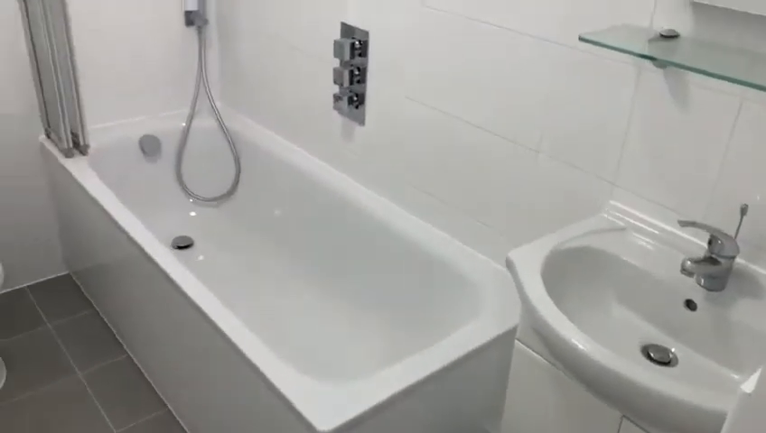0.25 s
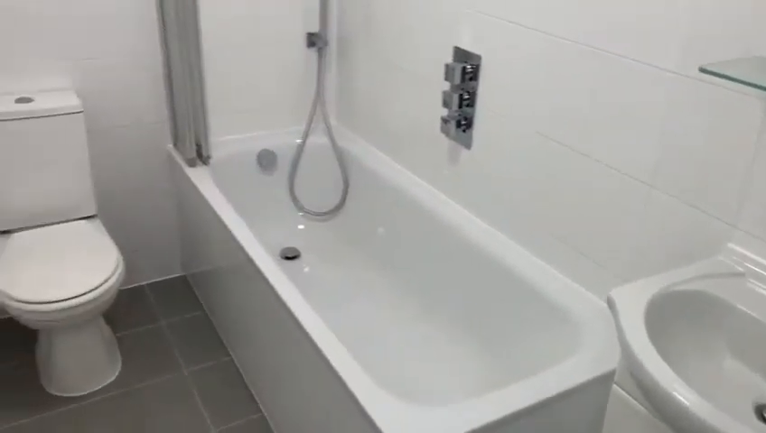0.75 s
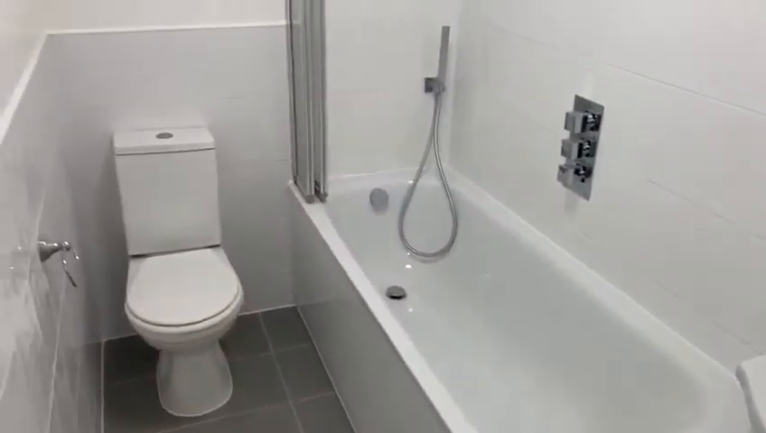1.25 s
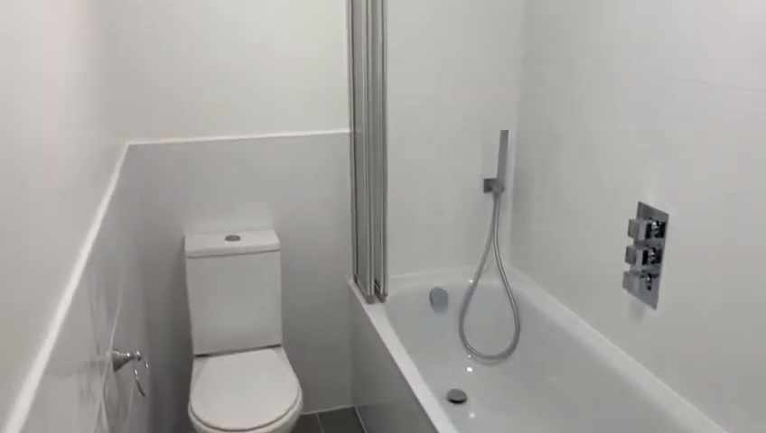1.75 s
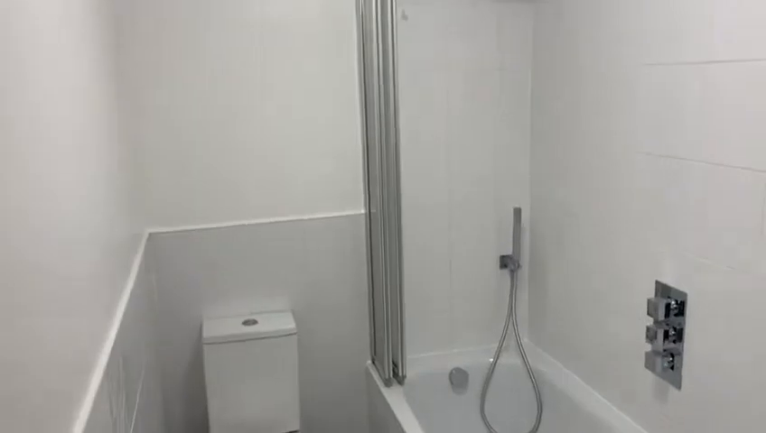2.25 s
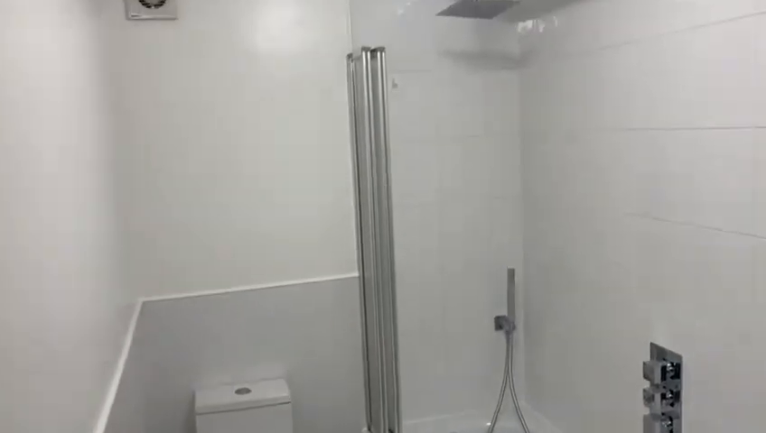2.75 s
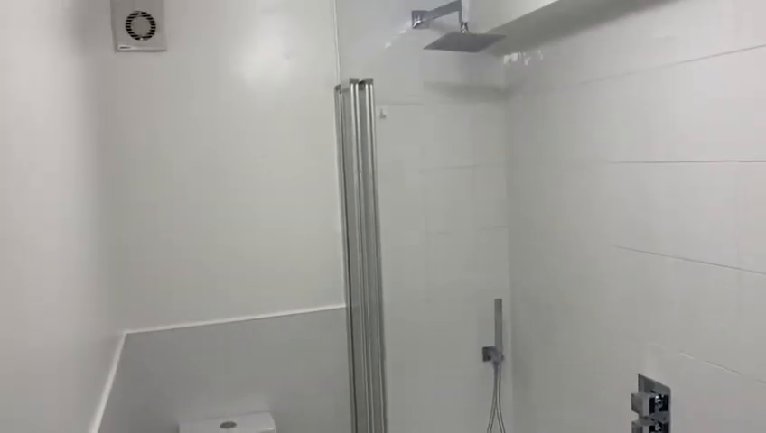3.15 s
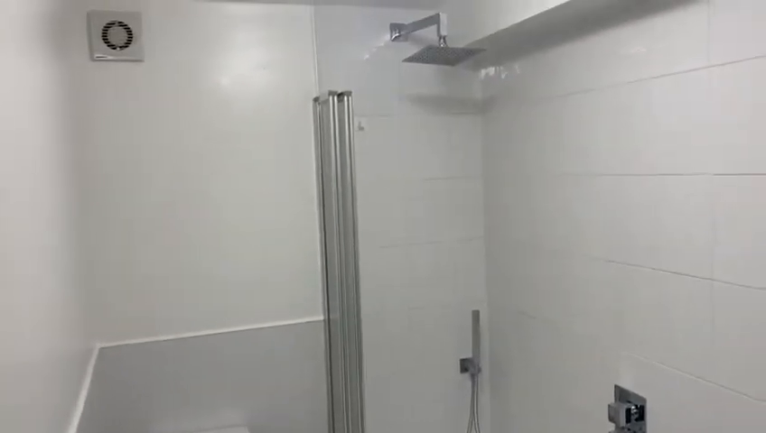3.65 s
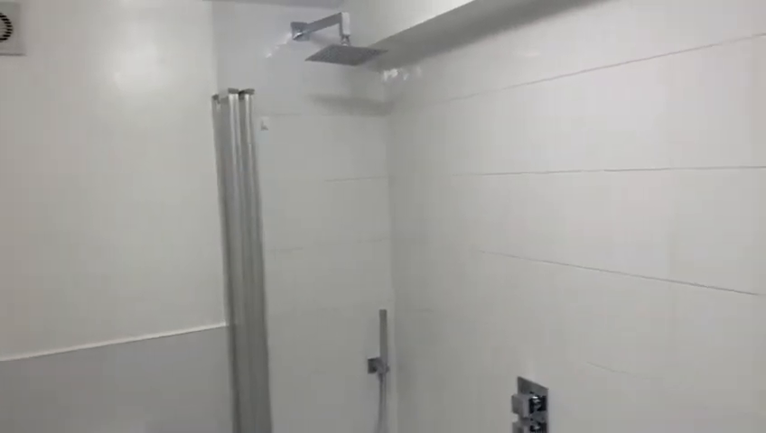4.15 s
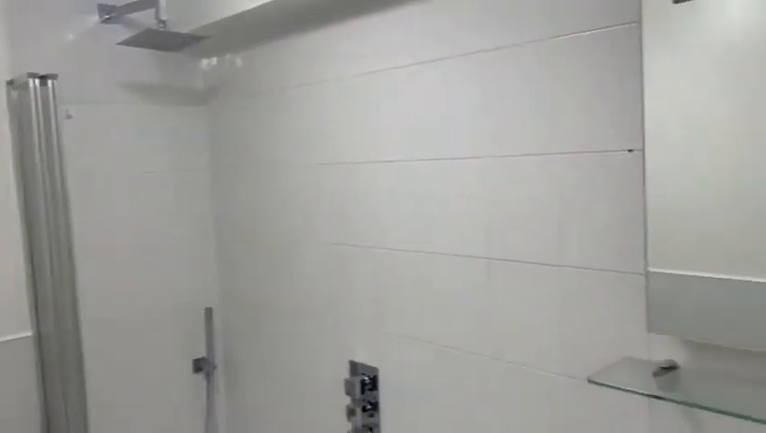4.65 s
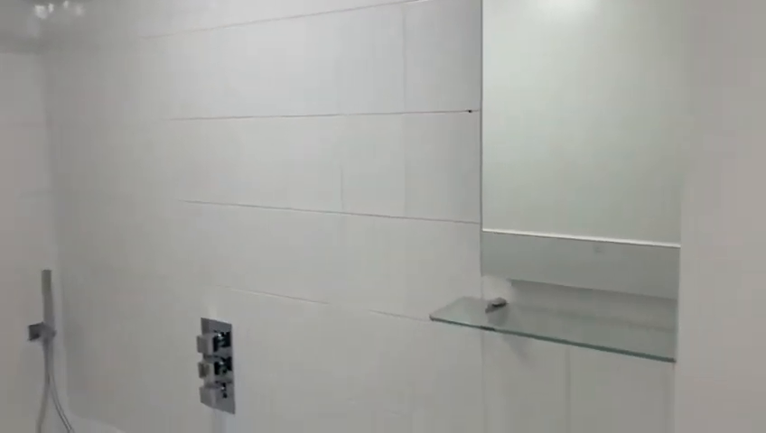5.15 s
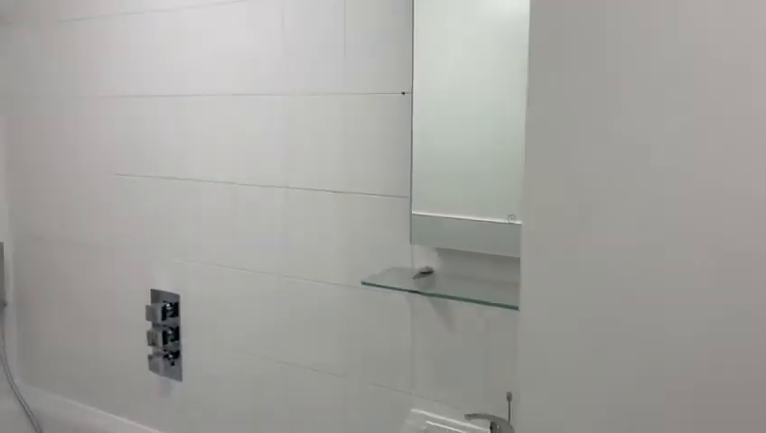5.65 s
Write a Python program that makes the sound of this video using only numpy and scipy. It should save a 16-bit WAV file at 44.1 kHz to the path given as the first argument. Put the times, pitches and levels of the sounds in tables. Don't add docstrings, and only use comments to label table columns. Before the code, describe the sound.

Steady bathroom fan drone, low and electrical, dominates from start to end, with a thin buzz and dull airflow behind it. Close to the hand-held microphone a sleeve rubs and soles slide at the opening; muffled weight shifts follow near three seconds, a faint brush at four, and short scuffs at about 5.4 and 5.8. The small tiled room makes individual tones drift in level and stereo position. Quiet, slightly dull capture.

```python
import sys
import numpy as np
from scipy import signal
from scipy.fft import rfft, irfft, next_fast_len
from scipy.io import wavfile
from scipy.ndimage import uniform_filter1d, map_coordinates

SR = 44100
rng = np.random.default_rng(int(sys.argv[2]) if len(sys.argv) > 2 else 0)


def bounce(signal):
    frames = np.transpose(np.atleast_2d(signal))
    limited = np.clip(frames, -1, 1)
    pcm = np.round(limited * 32767).astype(np.int16)
    wavfile.write(sys.argv[1], SR, pcm)


def decibels_to_gain(level_db):
    exponent = np.asarray(level_db, float) / 20
    return 10 ** exponent


N = 260183

PULL_HZ, SHAFT_HZ = 100.13, 42.76
FIRST_CREST_S = .00262
# (time [s], distance moved [cm])
WALK = [(0, 5), (1.2, 10.7), (2.2, 22.6), (3.3, 32.3), (4.2, 34.2), (5, 52), (5.55, 50), (5.7, 69.4),
        (5.9, 77)]


def unit(x):
    return x / np.sqrt(np.mean(x ** 2) + 1e-20)


def along(points, hz):
    f, v = np.transpose(points)
    return np.interp(np.log(hz + 1), np.log(f + 1), v)


def curves(rows):
    s, *cols = np.transpose(rows)
    return [np.interp(np.arange(N) / SR, s, c) for c in cols]


def wobble(rate):
    knots = rng.standard_normal(int(N * rate / SR) + 4)
    return map_coordinates(knots, [np.arange(N) * rate / SR])


def ports(pan_db):
    return decibels_to_gain(np.array([pan_db / 2, -pan_db / 2]))


def standing(wave):
    crest_db, place, spacing, depth_db = np.transpose(wave)[..., None]
    moved_cm = curves(WALK)[0]
    return crest_db - depth_db * np.sin(np.pi * (moved_cm - place) / spacing) ** 2


def tone(hum, shaft, lag):
    turns = (hum * PULL_HZ + shaft * SHAFT_HZ) * (np.arange(N) / SR - FIRST_CREST_S)
    return np.sqrt(2) * np.cos(2 * np.pi * turns - lag)


def rush(spectrum, patchy_db, lead_s, direct=1):
    # (frequency [Hz], left-right likeness [0-1])
    alike = [(30, .9), (80, 0.6), (200, .8), (400, .5), (1000, 0.36), (3000, 0.32), (6000, 0.24),
             (8500, 0.26), (11000, 0.4)]
    # (frequency [Hz], left-right difference [dB])
    lean = [(30, -6), (80, 8.5), (250, 1), (1000, 0), (8000, -2)]
    z = signal.stft(rng.standard_normal((2, N + 1024)), nperseg=512)[2]
    patches = uniform_filter1d(rng.standard_normal(z.shape[1:]), size=6, axis=0)
    patches = uniform_filter1d(patches, size=14, axis=1)
    pair = signal.istft(z * decibels_to_gain(patchy_db * unit(patches)), nperseg=512)[1]
    m = next_fast_len(N + 8192)
    hz = np.fft.rfftfreq(m, 1 / SR)
    turn = np.arccos(np.clip(direct * along(alike, hz), -1, 1)) / 2
    mid, side = rfft(pair, m) * decibels_to_gain(along(spectrum, hz)) * [np.cos(turn), np.sin(turn)]
    lead = np.exp(1j * np.pi * hz * lead_s * np.array([[1], [-1]]))
    stereo = np.array([mid + side, mid - side]) * ports(along(lean, hz)) * lead
    return unit(irfft(stereo, m)[:, :N])


def strokes(peak, rise, fall, db):
    edge_db = 15.5
    late = np.arange(N) / SR - peak
    away = np.where(late < 0, -late / rise, late / fall)
    return decibels_to_gain(db - edge_db * away ** 0.88).sum(0)


def drone():
    # (time [s], lag [rad], extra lag at the left port [rad])
    drag = [(0, .2, 0), (1.5, .05, .25), (3.8, 0, .25), (4.4, .15, 0), (5, .45, -.15), (5.5, .75, 0),
            (5.9, .85, .4)]
    # (crest [dB], crest place [cm], crest spacing [cm], depth [dB])
    drone_wave = [(-35, 30, 67, 2), (-33, 24.4, 55, 2.5)]
    lag, left_lag = curves(drag)
    sway_db = 0.5 * np.array([wobble(12), wobble(12)])
    return decibels_to_gain(standing(drone_wave) + sway_db) * tone(1, 0, np.array([lag + left_lag, lag]))


def octave():
    # (crest [dB], crest place [cm], crest spacing [cm], depth [dB])
    octave_wave = [(-44.5, 90, 170, 3.5), (-40, 16, 310, 0.91)]
    flutter_db, flutter_hz, flutter_wide_hz = [[-57], [-54]], -6.5, 7
    slip = -2 * np.pi * flutter_hz * np.arange(N) / SR
    flutter = sum(wobble(flutter_wide_hz) * tone(2, 0, slip + q) for q in (0, np.pi / 2))
    return decibels_to_gain(standing(octave_wave)) * tone(2, 0, 1.2) + decibels_to_gain(flutter_db) * unit(flutter)


def buzz():
    orders = [
        (3, 0, .5),
        (4, 0, -.4),
        (5, 0, 1.2),
        (1, 13, 0),
        (0, 45, 0),
        (0, 26, 0),
        (6, 0, 0),
        (0, 13, 0),
    ]
    side_phase = [(0.14, -0.013), (1.5, -0.015), (1.17, 0.0081), (0.1, 0.056), (4, -.07), (1.65, -0.0039),
                  (0.5, .01), (0.5, 0.003)]
    # (crest [dB], crest place [cm], crest spacing [cm], depth [dB])
    third_wave = [(-62, 41, 96, 11), (-51.5, 53.7, 160, 23)]
    fourth_wave = [(-53, 51, 91, 10.3), (-60, 58, 52, 7.5)]
    fifth_wave = [(-60, 56, 130, 7), (-56.5, 27, 44, 3.7)]
    slot_wave = [(-60, 20, 96, 10), (-59, 11, 100, 8)]
    whistle_wave = [(-71, 43, 15, 13), (-70.5, 43, 15, 16)]
    low_whistle_wave = [(-71, 48, 75, 8), (-74, 46, 40, 6.8)]
    sixth_wave = [(-71.5, 43, 100, 3), (-65, 12, 97, 9)]
    bar_wave = [(-71, 40, 80, 4), (-68, 45, 80, 8)]
    waves = (third_wave, fourth_wave, fifth_wave, slot_wave,
             whistle_wave, low_whistle_wave, sixth_wave, bar_wave)
    moved_cm = curves(WALK)[0]
    out = np.zeros((2, N))
    for wave, (multiple, order, late), (gap, turning) in zip(waves, orders, side_phase):
        unsteady = decibels_to_gain(standing(wave) + 1.3 * np.array([wobble(3.6), wobble(6.9)]))
        drift = (0.069 + 0.045 * order) * wobble(1.2)
        port_lag = [[0], [1]] * (gap + turning * moved_cm)
        out += unsteady * tone(multiple, order, late + drift + port_lag)
    return out


def rotor():
    orders = [(1, 1), (2, -1), (2, 1), (3, -1), (2, 2), (4, -1), (0, 9), (0, 15), (1, 14), (0, 39), (0, 54)]
    # (level [dB], left-right difference [dB])
    levels = [(-61, -3), (-57.5, -3), (-68, 0), (-69, 0), (-69, 0), (-74, 0), (-67, 3), (-73, -2), (-77, 0),
              (-84.5, -2), (-90, 0)]
    out = np.zeros((2, N))
    for (multiple, order), (db, pan_db) in zip(orders, levels):
        fading = decibels_to_gain(db + (0.1 + 0.1 * abs(order)) * np.array([wobble(1.3), wobble(0.97)]))
        port_drift = min(1.1, 0.033 * multiple + 0.2 * abs(order))
        drift = .16 * order * wobble(1.6) + port_drift * np.array([wobble(0.64), wobble(.7)])
        out += fading * ports(pan_db)[:, None] * tone(multiple, order, drift)
    return out


def air():
    # (frequency [Hz], density [dB/Hz])
    duct_spectrum = [(15, -27), (25, -18), (40, -13), (55, -12), (80, -3), (120, -8.5), (180, -9),
                     (260, -7.5), (330, -11.5), (450, -14), (620, -17.5), (760, -23.5), (1100, -32),
                     (1500, -120)]
    # (frequency [Hz], density [dB/Hz])
    grille_spectrum = [(300, -39.5), (600, -6), (780, -1.5), (880, -1.5), (1100, .5), (1300, -3),
                       (2000, -4), (2600, -7.5), (3100, -7), (3350, -11), (3650, -10), (4200, -12),
                       (5200, -18.5), (6500, -26), (7400, -25.5), (8000, -28), (10000, -29), (11800, -38.5),
                       (13000, -120)]
    duct_wave, grille_wave = (-48.5, 29.5, 75, 2), (-58.5, 42.5, 50.5, 1.17)
    upper_hz, upper_wave = 480, (.7, 18, 110, 4)
    lead_s = .00045
    duct = decibels_to_gain(.4 * wobble(7)) * rush(duct_spectrum, patchy_db=.5, lead_s=lead_s / 2)
    highpass = signal.butter(2, upper_hz, "high", fs=SR, output="sos")
    upper = signal.sosfiltfilt(highpass, duct)
    duct = duct + (decibels_to_gain(standing(upper_wave)) - 1) * upper
    grille = rush(grille_spectrum, patchy_db=1.73, lead_s=lead_s, direct=.7)
    grille = decibels_to_gain(0.39 * wobble(6.7)) * grille
    return decibels_to_gain(standing(duct_wave)) * duct + decibels_to_gain(standing(grille_wave)) * grille


def rustle():
    # (peak [s], rise [s], fall [s], cloth level [dB], sole level [dB])
    slides = [(.17, 0.18, 0.18, -69, -63), (.28, 0.21, 0.21, -61, -65.5), (.45, 0.18, 0.15, -63.5, -63.5),
              (.548, 0.03, 0.08, -57.5, -66), (.59, .06, .08, -57.5, -68), (3.93, 0.086, 0.13, -65, -82),
              (4.14, 0.15, 0.4, -62.5, -68.5), (5.411, 0.11, 0.19, -59, -65.5),
              (5.459, 0.05, 0.086, -63.5, -56.5), (5.8, 0.048, 0.091, -58, -68),
              (5.83, 0.027, .05, -62, -62)]
    # (peak [s], rise [s], fall [s], level [dB])
    brushes = [
        (.3, .15, 0.25, -73),
        (.55, .04, 0.084, -72),
        (4.049, .2, .35, -79),
        (5.41, .07, 0.13, -71),
    ]
    # (frequency [Hz], density [dB/Hz])
    cloth_spectrum = [(1200, -41), (2200, -3.5), (3200, 1), (4800, 0), (6500, -5), (8400, -13.5),
                      (10300, -22), (11600, -24.5), (13000, -120)]
    # (frequency [Hz], density [dB/Hz])
    sole_spectrum = [(400, -36.5), (800, -5), (1200, 0.5), (2000, 2.5), (3000, -5), (5000, -25),
                     (7000, -120)]
    # (frequency [Hz], density [dB/Hz])
    weave_spectrum = [(5000, -40.5), (7500, -5.5), (9000, 0), (10300, -5), (11600, -14), (13000, -120)]
    peak, rise, fall, cloth_db, sole_db = np.transpose(slides)[..., None]
    grain = decibels_to_gain(1.1 * wobble(60) + .8 * wobble(18))
    catching = decibels_to_gain(1.2 * wobble(35))
    cloth = rush(cloth_spectrum, patchy_db=2.5, lead_s=0.00019, direct=0.26)
    cloth = strokes(peak, rise, fall, cloth_db) * catching * cloth
    sole = rush(sole_spectrum, patchy_db=2.0, lead_s=0.000097, direct=0.79)
    sole = strokes(peak, rise, fall, sole_db) * sole
    weave = rush(weave_spectrum, patchy_db=0.5, lead_s=0, direct=0)
    weave = strokes(*np.transpose(brushes)[..., None]) * weave
    return grain * (cloth + sole + weave)


def steps():
    # (time [s], peak level [dB], pitch [Hz], left-right difference [dB])
    footfalls = [(.075, -43, 52, 1), (.135, -49, 45.4, -2), (.54, -52, 54.4, 0), (2.92, -49, 58.4, -7),
                 (2.96, -53, 247, -2), (3.08, -52, 42, -4), (3.19, -52, 49.8, 1), (3.371, -45.5, 54.7, 0.5),
                 (5.3, -45, 72, 0), (5.452, -60, 810, 0), (5.466, -59, 1040, 0), (5.73, -47, 58, -3),
                 (5.87, -46, 45, -2)]
    out = np.zeros((2, N + SR))
    t = np.arange(SR // 2) / SR
    for s, db, hz, pan_db in footfalls:
        fade = decibels_to_gain(db + 7.0 - 60 * t / .22 * (hz / 50) ** .3)
        onset = 1 - np.exp(-t / .02 * (hz / 50) ** .6)
        push = np.sin(2 * np.pi * hz * t) * fade * onset
        out[:, round(s * SR):][:, :len(t)] += ports(pan_db)[:, None] * push
    return out[:, :N]


def scene():
    return drone() + octave() + buzz() + rotor() + air() + rustle() + steps()


def band_limit(x):
    return signal.sosfilt(signal.butter(12, 11700, fs=SR, output="sos"), x)


def record(dry):
    # (frequency [Hz], level [dB])
    masked = [(680, -40), (780, -19), (880, -14), (1050, -16), (1500, -10), (2800, -8), (3350, -5.5),
              (3800, -7), (4400, -6.5), (5600, -3.5), (7000, -4.5), (7800, -2), (8400, -6.5)]
    margin = 4096 - 534
    pair = np.array([dry[0] + dry[1], dry[0] - dry[1]])
    pair = np.pad(pair, ((0, 0), (margin, margin)), "reflect", reflect_type="odd") / 2
    hz, _, z = signal.stft(pair, SR, window="cosine", nperseg=2048)
    z[1, (hz > 8250) & (hz < 10350)] *= decibels_to_gain(-12)
    z[0, hz > 10450] *= decibels_to_gain(-5.5)
    z[0, hz > 11130] = 0
    narrow = uniform_filter1d(abs(z) ** 2, size=6, axis=1)
    local = uniform_filter1d(narrow.sum(axis=0), size=48, axis=0)
    local = uniform_filter1d(local, size=3, axis=1)
    uneven = uniform_filter1d(rng.standard_normal(z.shape), size=16, axis=1)
    uneven = uniform_filter1d(uneven, size=3, axis=2)
    side_spared_db = 1.8 * np.clip(hz / 6000, 0, 1)[:, None] * [[[0]], [[1]]]
    threshold_db = along(masked, hz)[:, None] + (2.0 * unit(uneven) - side_spared_db)
    z *= narrow > local * decibels_to_gain(2 * threshold_db)
    thinned = signal.istft(z, SR, window="cosine", nperseg=2048)[1]
    mid, side = thinned[:, margin:margin + N]
    return band_limit(np.array([mid + side, mid - side]))


dry = scene()
out = record(dry)
bounce(out)
```